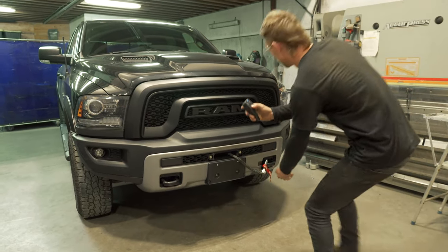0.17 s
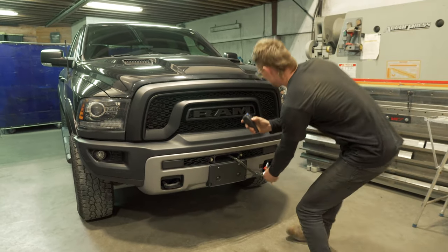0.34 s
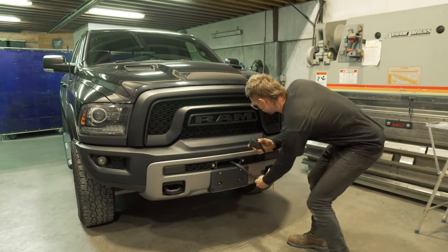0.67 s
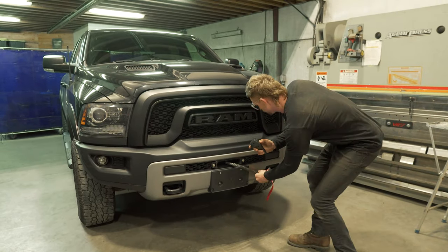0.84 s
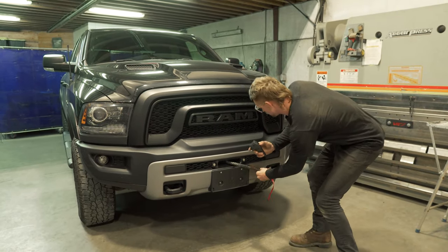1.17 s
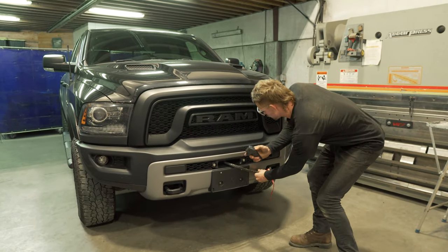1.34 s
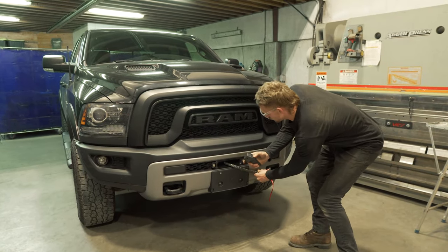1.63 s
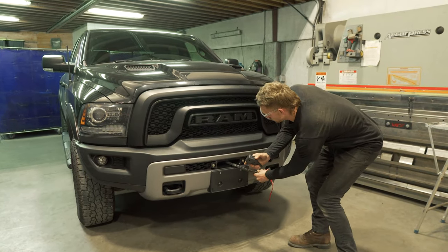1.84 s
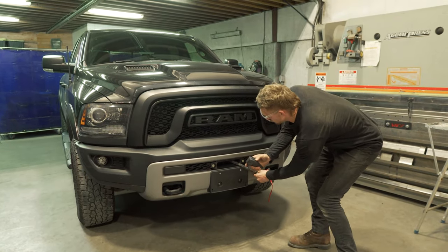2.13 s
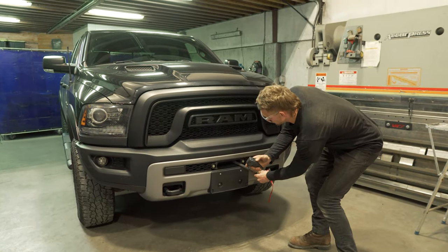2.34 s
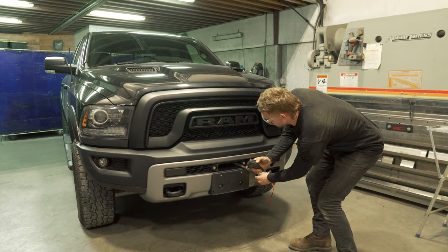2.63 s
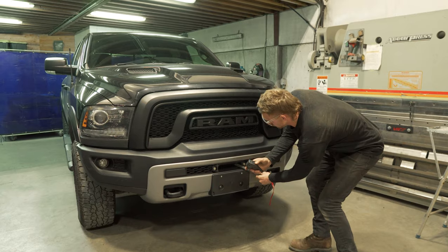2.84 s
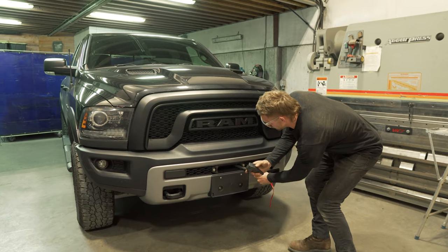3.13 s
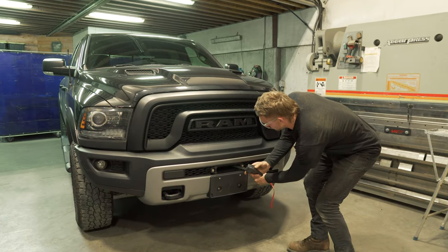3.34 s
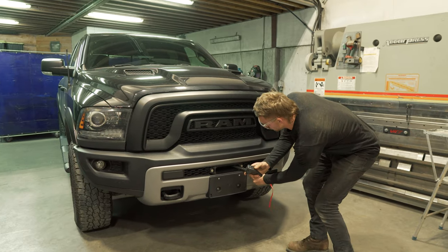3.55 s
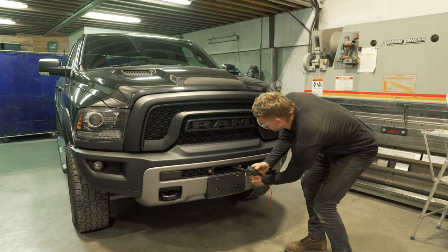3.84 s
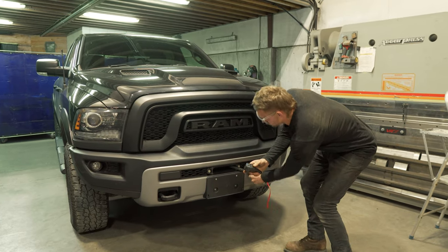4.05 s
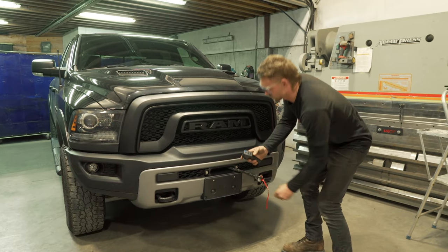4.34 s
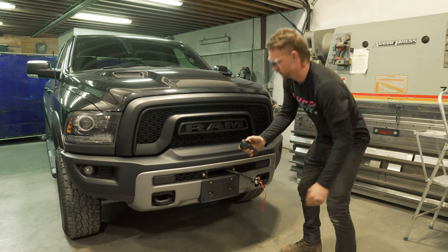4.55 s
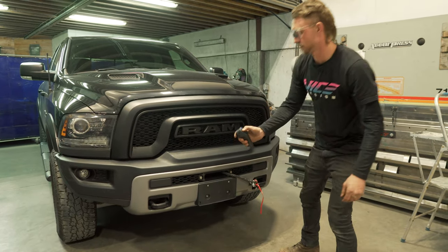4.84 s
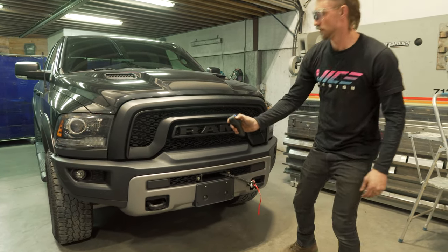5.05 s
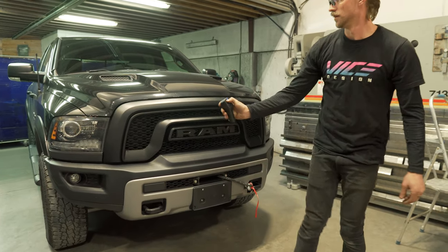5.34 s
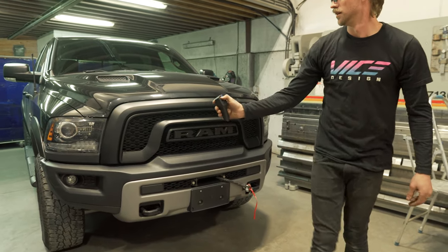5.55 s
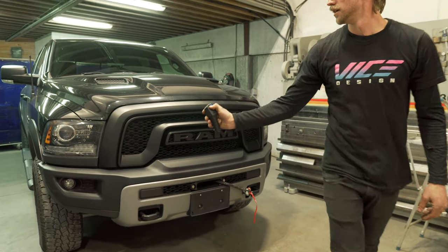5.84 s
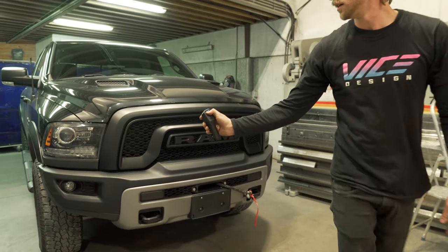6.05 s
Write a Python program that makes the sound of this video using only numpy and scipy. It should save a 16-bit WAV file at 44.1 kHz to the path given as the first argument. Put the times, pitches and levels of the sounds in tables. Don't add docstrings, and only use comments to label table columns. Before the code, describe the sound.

In a quietly humming workshop, boots scuff and land on concrete, then an electric winch grinds in two short bursts, followed by a step and a metallic hook snap.

```python
import sys
import numpy as np
from scipy import signal
from scipy.fft import rfft, irfft, next_fast_len
from scipy.io import wavfile
from scipy.ndimage import uniform_filter1d, map_coordinates

SR = 44100
rng = np.random.default_rng(int(sys.argv[2]) if len(sys.argv) > 2 else 0)


def ratio_of_db(decibels):
    return 10 ** (np.asarray(decibels, float) / 20)


def materialize(psi):
    bounded = np.clip(np.atleast_2d(psi).T, -1, 1)
    quanta = np.round(bounded * 32767).astype(np.int16)
    wavfile.write(sys.argv[1], SR, quanta)


N = 273222
SILENT_DB = -110
HIT_T = np.arange(SR // 4) / SR


def unit(x):
    return x / np.sqrt(np.mean(x ** 2) + 1e-20)


def along(points, hz):
    f, v = np.transpose(points)
    return np.interp(np.log(hz + 1), np.log(f + 1), v)


def curves(tables, outside=None):
    if outside is not None:
        def rest(s, row):
            return [(s,) + (outside,) * (len(row) - 1)]
        tables = [rest(t[0][0] - .004, t[0]) + list(t) + rest(t[-1][0] + .1, t[0]) for t in tables]
    s, *cols = np.transpose(sorted(tuple(row) for t in tables for row in t))
    return [np.interp(np.arange(N) / SR, s, c) for c in cols]


def wobble(rate):
    knots = rng.standard_normal(int(N * rate / SR) + 4)
    return map_coordinates(knots, [np.arange(N) * rate / SR])


def filtered(x, response):
    m = next_fast_len(N + SR // 2)
    return irfft(rfft(x, m) * response(np.fft.rfftfreq(m, 1 / SR)), m)[:N]


def patchy(x, patchy_db, count=5):
    z = signal.stft(np.pad(x, (0, 512)), nperseg=512)[2]
    field = uniform_filter1d(rng.standard_normal(z.shape), size=count, axis=0)
    field = uniform_filter1d(field, size=8, axis=1)
    return signal.istft(z * ratio_of_db(patchy_db * unit(field)), nperseg=512)[1][:N]


def rush(spectrum, patchy_db):
    noise = patchy(rng.standard_normal(N), patchy_db)
    return unit(filtered(noise, lambda hz: ratio_of_db(along(spectrum, hz))))


def swell(s, db, rise_s, fall_s):
    t = np.arange(N) / SR - s
    return ratio_of_db(db + 20 * np.minimum(t / rise_s, -t / fall_s))


def ring(hz, t60, rough, t, rise=0.00024, tone=1):
    around = signal.butter(2, [hz / 1.7, min(hz * 1.7, .45 * SR)], "bandpass", fs=SR)
    blur = unit(signal.lfilter(*around, rng.standard_normal(len(t))))
    vibration = tone * np.sin(2 * np.pi * hz * t) + rough * blur
    return vibration * ratio_of_db(-60 * t / t60) * (1 - np.exp(-t / rise))


def crack(t60):
    noise = np.diff(rng.standard_normal(len(HIT_T) + 2), 2)
    return unit(noise) * ratio_of_db(-60 * HIT_T / t60)


def add(track, s, x):
    part = track[round(s * SR):][:len(x)]
    part += x[:len(part)]


# pitch_hz, level_db (per Hz)
FAN_SPECTRUM = [(110, -21), (180, -10), (240, -7.5), (290, -10.5), (400, -9), (520, -11), (620, -13.5),
                (1260, -12), (1500, -18), (2500, -27.5), (4260, -34), (5600, -37.5), (6930, -45),
                (15800, -54)]


def fans():
    return ratio_of_db(-42.5 + 0.34 * wobble(4.075)) * rush(FAN_SPECTRUM, patchy_db=1.0)


# pitch_hz, level_db (per Hz)
RUMBLE_SPECTRUM = [(20, -6), (26, -1.5), (32, -7), (55, 1), (85, -15), (120, -5.5), (190, -13.5),
                   (260, -56)]


def rumble():
    noise = rng.standard_normal(N)
    return ratio_of_db(-45) * unit(filtered(noise, lambda hz: ratio_of_db(along(RUMBLE_SPECTRUM, hz)) * (hz > 18)))


# pitch_hz, level_db (rms)
HUM_TONES = [(118.4, -52), (237.5, -48), (360.7, -55), (522.2, -53.5)]


def hum():
    t = np.arange(N) / SR
    return sum(ratio_of_db(db + 2.5 + 0.72 * wobble(5)) * np.sin(2 * np.pi * hz * t + 0.13 * wobble(3.94))
               for hz, db in HUM_TONES)


# time_s, pitch_hz, level_db
AIR_SWINGS = [(0.0, 16.8, -23), (1.05, 16.8, -25), (1.31, 12.7, -21), (1.38, 12.8, -32), (1.72, 12.8, -21),
              (1.83, 12.8, -35), (2.09, 12.8, -18), (2.33, 12.8, -32), (2.59, 12.8, -23), (2.69, 12.8, -38),
              (3.14, 12.8, -25), (3.23, 12.7, -31), (3.35, 11.4, -18), (4.43, 11.4, -31), (4.69, 11.4, -19),
              (4.76, 11.4, -28), (5.63, 11.4, -19), (6.2, 11.4, -24)]


def air():
    hz, db = curves([AIR_SWINGS])
    phase = 2 * np.pi * np.cumsum(hz * (1 + .12 * wobble(5))) / SR
    swing = ratio_of_db(db + 2.2 + 2.8 * wobble(9)) * np.sin(phase)
    return filtered(swing, lambda f: 1 / (1 + (f / 21) ** 16))


# peak_s, sole_db, cloth_db, rise_s, fall_s (per 20 dB)
SCUFF_MOVES = [(.008, -44, -60, .03, .22), (.108, -42, -50, .02, .14), (.428, -44.5, -53, .015, .13),
               (.586, -41.5, -58, .17, .18), (.81, -24.5, -38.5, .09, .2), (1.224, -40.5, -55, .13, .1),
               (4.165, -50, -84, .05, .05), (4.259, -32, -39, .04, .033), (4.29, -47, -66, .04, .26),
               (4.583, -41, -59, .005, .3), (4.628, -37, -56, .055, .035), (4.69, -43, -56, .08, .17),
               (4.985, -57, -78, .04, .4), (5.398, -48, -74, .03, .025), (5.59, -50.5, -62, .15, .9),
               (5.81, -49.5, -63, .1, .45), (6.082, -54, -72, .4, .2), (6.195, -51, -62, .22, .2)]
# pitch_hz, level_db (per Hz)
SOLE_SPECTRUM = [(760, -11), (1300, -5.5), (1710, -10), (2460, -2.5), (2970, -1.5), (4710, -6.5),
                 (9000, -24), (11700, -51), (19800, -120)]
# pitch_hz, level_db (per Hz)
CLOTH_SPECTRUM = [(5000, -38.5), (8000, 2.5), (12000, -0.5), (15800, -4.5)]
# peak_s, level_db, rise_s, fall_s (per 20 dB)
BOOT_LANDINGS = [
    (.748, -46, .08, .12),
    (.89, -20.5, .014, .16),
    (.945, -26, .06, .06),
    (4.146, -31, .018, .09),
    (4.225, -40, .1, .1),
    (4.262, -25, .03, .09),
    (4.6, -43, .04, .5),
]
# pitch_hz, level_db (per Hz)
BOOT_SPECTRUM = [(59, -51), (100, -11), (279, -12.5), (373, -5.5), (423, -14), (781, -11), (2000, -30),
                 (2600, -78), (4400, -120)]


def scuffs():
    quicker = 1.25
    soles = [swell(s, db, up, down) for s, db, _, up, down in SCUFF_MOVES]
    cloths = [swell(s, db, up / quicker, down / quicker) for s, _, db, up, down in SCUFF_MOVES]
    sole = np.max(soles, axis=0).clip(ratio_of_db(-63))
    cloth = np.max(cloths, axis=0).clip(ratio_of_db(-79))
    boot = sum(swell(*row) for row in BOOT_LANDINGS)
    grit = unit(ratio_of_db(1.15 * wobble(250)))
    drag = sole * rush(SOLE_SPECTRUM, patchy_db=1.0) + cloth * rush(CLOTH_SPECTRUM, patchy_db=-1.5)
    return grit * drag + ratio_of_db(-2.0) * boot * rush(BOOT_SPECTRUM, patchy_db=-0.5)


# start_s, level_db (peak)
DRY_TICKS = [(0.4289, -46), (1.5179, -47), (1.686, -49), (2.92, -50), (4.257, -28), (5.1362, -46),
             (5.3752, -47), (5.7544, -56)]


def dry_ticks(out):
    for s, db in DRY_TICKS:
        add(out, s, ratio_of_db(db - 2) * crack(.012))


# start_s, level_db (peak), pitch_hz, t60_s
BOOT_THUDS = [
    (.887, -10, 410, 0.063),
    (0.946, -24, 357, .09),
    (1.357, -25, 230, .04),
    (4.256, -14.5, 198, 0.054),
]


def boot_thuds(out):
    for s, db, hz, t60 in BOOT_THUDS:
        add(out, s, ratio_of_db(db + 0.5) * ring(hz, t60, 0.2, HIT_T, rise=0.0023))


# start_s, pitch_hz, level_db, t60_s
STEEL_TONES = [(.12, 6780, -70, 1.2), (.9, 10100, -45, .25), (.92, 13500, -58, .2), (3.82, 6800, -64, 2),
               (5.392, 5000, -47, 0.057), (5.392, 3650, -52, .06)]


def steel_tones(out):
    for s, hz, db, t60 in STEEL_TONES:
        add(out, s, ratio_of_db(db) * ring(hz, t60, .05, np.arange(SR) / SR, rise=0.0021))


# start_s, level_db (peak)
KEY_TAPS = [(5.4869, -51), (5.5064, -48), (5.5273, -45), (5.5744, -51), (5.5827, -46), (5.6012, -48),
            (5.6124, -52), (5.6755, -47)]


def keys(out):
    for s, db in KEY_TAPS:
        low, high = ring(7900, .018, .6, HIT_T, tone=.7), ring(12100, .015, .6, HIT_T)
        add(out, s, ratio_of_db(db - 2.5) * (low + .3 * high))


# pitch_hz, level_db, t60_s
HOOK_MODES = [(1100, -5, .045), (2000, -4, .04), (2400, -5, .04), (2750, -4, .04), (3350, -3, .036),
              (3900, -6, .03), (4800, -9, .025)]


def hook_snap(out):
    start_s, level_db = 4.6522, -14.5
    dull = signal.butter(4, 5800, fs=SR)
    for hz, db, t60 in HOOK_MODES:
        mode = ring(hz, t60, 0.45, HIT_T, tone=.4)
        add(out, start_s, ratio_of_db(level_db + db) * signal.lfilter(*dull, mode))


# start_s, level_db (peak), pitch_hz, t60_s, treble_db
SMALL_CLICKS = [(0.2947, -37.5, 2930, 0.037, -16), (1.7884, -11, 3170, 0.04, -16),
                (2.7477, -56, 2150, 0.042, -16), (2.8953, -26, 3160, 0.051, -16),
                (2.9407, -12, 2410, 0.042, -16), (4.1425, -34, 2510, 0.067, -20),
                (4.5805, -30.5, 2400, 0.034, -16), (5.3173, -38, 2820, 0.021, -16),
                (5.8114, -34, 2370, 0.04, -16), (6.0751, -41, 2178, 0.04, -16)]


def clicks(out):
    for s, db, hz, t60, treble_db in SMALL_CLICKS:
        body = ring(hz, t60, 1.43, HIT_T, tone=0.25)
        add(out, s, ratio_of_db(db - 12) * (body + ratio_of_db(treble_db) * crack(0.56 * t60)))


# start_s, level_db (peak), pitch_hz, t60_s
BRAKE_BITES = [
    (2.567, -36, 5500, 0.078),
    (2.567, -36, 5140, 0.044),
    (3.668, -33, 5400, .1),
    (3.668, -36, 5900, .05),
]


def brake(out):
    for s, db, hz, t60 in BRAKE_BITES:
        add(out, s, ratio_of_db(db) * ring(hz, t60, .35, HIT_T, rise=.003))


# start_s, level_db (peak), pitch_hz, t60_s
GEAR_KNOCKS = [(1.723, -3, 854, 0.058), (1.743, -9, 996, 0.06), (1.834, -4.5, 451, 0.066),
               (1.849, -5, 488, 0.054), (1.865, -6.5, 1172, 0.073), (2.954, -5.5, 869, 0.16),
               (2.974, -9, 1176, 0.055), (2.994, 2, 530, 0.025), (3.07, -15.5, 460, 0.05),
               (3.084, -14, 490, 0.051), (3.319, -13, 601, 0.072), (3.609, -10.5, 936, 0.061),
               (1.734, -14, 1705, 0.044),
    (1.784, -6, 1636, 0.075),
    (1.794, -7, 1730, 0.053),
    (2.965, -9, 1690, 0.06),
    (3.031, -8, 1610, 0.06),
]


def gear_knocks(out):
    for s, db, hz, t60 in GEAR_KNOCKS:
        add(out, s, ratio_of_db(db - 4.5) * ring(hz, t60, 0.47, HIT_T, rise=0.0012))


def hits():
    out = np.zeros(N)
    for source in (dry_ticks, boot_thuds, steel_tones, keys, hook_snap, clicks, brake, gear_knocks):
        source(out)
    return out


# start_s, level_db (strength)
RELAY_CLOSES = [
    (1.698, 0),
    (2.9328, -2),
]


def driven(motion, law, delay_s, jolt_db, rise_s, fall_s):
    speed_db, strain_db = motion
    full_db, by_speed, by_strain = law
    jolt = sum(swell(s + delay_s, jolt_db + relay_db, rise_s, fall_s) ** 2 for s, relay_db in RELAY_CLOSES)
    running = ratio_of_db(full_db + by_speed * (speed_db + 30) + by_strain * strain_db)
    return np.sqrt(running ** 2 + jolt)


# pitch_hz, level_db (per Hz)
GRIND_SPECTRUM = [(53, -46), (90, -4.5), (180, -7.5), (359, -3.5), (553, 0.5), (687, -9.5), (1210, -5.5),
                  (1500, -13), (2110, -14), (2620, -10), (5130, -21.5), (6230, -29), (8620, -32),
                  (12700, -25), (15800, -30.5)]


def part_of_winch(blows, modes, lo_hz, hi_hz, modes_db, spiky_db, shifting_db):
    contacts = rng.standard_normal(N) * ratio_of_db(spiky_db * wobble(420)) + blows

    def body(f):
        band = 1 / np.sqrt((1 + (lo_hz / (f + 1)) ** 8) * (1 + (f / hi_hz) ** 8))
        peaks = sum(ratio_of_db(db) * 1j * f * w / (c * c - f * f + 1j * f * w) for c, w, db in modes)
        grind = ratio_of_db(along(GRIND_SPECTRUM, f)) / ratio_of_db(along(GRIND_SPECTRUM, modes[0][0]))
        return band * (grind + ratio_of_db(modes_db) * peaks)

    return unit(patchy(filtered(contacts, body), shifting_db, count=6))


# pitch_hz, width_hz, level_db
DRUM_MODES = [(335, 98, 1), (410, 86, -1), (535, 59, -4)]
# level_db, db_per_speed_db, db_per_strain_db
DRUM_DRIVE = (-24, .56, .55)


def drum(blows, motion):
    sound = part_of_winch(.5 * blows, DRUM_MODES, 60, 544, modes_db=4, spiky_db=-1.0, shifting_db=0.0)
    return sound * driven(motion, DRUM_DRIVE, delay_s=.005, jolt_db=-20, rise_s=.006, fall_s=.14)


# pitch_hz, width_hz, level_db
CASING_MODES = [(784, 25, 5), (863, 25, 6.5), (976, 14, -2), (1058, 30, 0), (1184, 17, 2.5),
                (1306, 15, -6.5), (1560, 11, -21), (1666, 25, 5), (1950, 43, -7)]
# level_db, db_per_speed_db, db_per_strain_db
CASING_DRIVE = (-19.5, .74, .15)


def casing(blows, motion):
    sound = part_of_winch(.49 * blows, CASING_MODES, 696, 2150, modes_db=-4.0, spiky_db=-0.4, shifting_db=1.0)
    return sound * driven(motion, CASING_DRIVE, delay_s=.03, jolt_db=-13, rise_s=.026, fall_s=.09)


# pitch_hz, width_hz, level_db
TEETH_MODES = [(2560, 84, 2), (2820, 27, -26), (3150, 130, -6.5), (3430, 51, 2), (3775, 190, -3),
               (4260, 100, -6), (4670, 100, -2.5), (5010, 100, -4), (5420, 70, -5)]
# level_db, db_per_speed_db, db_per_strain_db
TEETH_DRIVE = (-20, 1.15, 1.01)


def teeth(blows, motion):
    sound = part_of_winch(.35 * blows, TEETH_MODES, 1950, 7000, modes_db=-4.5, spiky_db=1.8, shifting_db=1.1)
    return sound * driven(motion, TEETH_DRIVE, delay_s=.007, jolt_db=-14, rise_s=.005, fall_s=.05)


# pitch_hz, width_hz, level_db
BRUSH_MODES = [(9600, 68, 2), (10100, 60, -4), (10700, 60, -8), (10600, 60, -9), (12040, 60, -3),
               (12500, 55, 3), (13000, 55, -3)]


def brushes(blows, motion):
    sound = part_of_winch(.15 * blows, BRUSH_MODES, 7000, 17000, modes_db=1.5, spiky_db=1.2, shifting_db=.7)
    return ratio_of_db(motion[0] + .3) * sound


# time_s, pitch_hz, level_db
MESH_BURSTS = [
    [(1.85, 407.7, -39), (1.894, 376.3, -32), (1.92, 372.8, -38), (1.976, 393.4, -22), (2.022, 362.5, -40),
     (2.062, 393, -42), (2.156, 336, -37), (2.206, 355.2, -31), (2.45, 324.4, -37)],
    [(3.3, 446.3, -30), (3.354, 423.8, -30), (3.398, 376.6, -22.5), (3.458, 354, -20.5), (3.58, 327.8, -36),
     (3.636, 344.8, -31), (3.72, 341.7, -46)],
]


def gear_mesh():
    hz = curves(MESH_BURSTS)[0]
    db = curves(MESH_BURSTS, outside=SILENT_DB)[1]
    turn = 2 * np.pi * np.cumsum(hz * (1 + 0.01356 * wobble(30))) / SR
    return ratio_of_db(db + 2.5 + 2.2 * wobble(24.82)) * np.sin(turn)


# time_s, speed_db (as brush hiss), strain_db (of the rope)
WINCH_BURSTS = [
    [(1.699, -44, 0), (1.71, -35.5, -1), (1.85, -30, 2.5), (2.084, -34.5, 1), (2.17, -35, 4.5),
     (2.3, -38, -1.5), (2.5, -45, 1.5), (2.62, -53, 1), (2.745, -82, 0)],
    [(2.935, -48, 0), (2.99, -36.5, 0), (3.076, -31.5, 3.5), (3.11, -31, -2.5), (3.4, -36, -2),
     (3.46, -38, 6), (3.61, -41.5, -.8), (3.774, -54.5, 1.5), (3.85, -84, 0)],
]


def winch():
    motion = curves(WINCH_BURSTS, outside=SILENT_DB)
    blows = unit((rng.random(N) < 500 / SR) * rng.standard_normal(N))
    return sum(part(blows, motion) for part in (drum, casing, teeth, brushes)) + gear_mesh()


# pitch_hz, t60_s
WALL_DECAY = [(200, 0.49), (2000, 0.44), (10000, 0.19)]


def walls(x):
    hz, t, z = signal.stft(rng.standard_normal(SR // 2), SR, nperseg=256)
    tail = signal.istft(z * ratio_of_db(-60 * t / along(WALL_DECAY, hz)[:, None]), SR, nperseg=256)[1]
    return signal.fftconvolve(np.pad(x, (300, 0)), tail / np.linalg.norm(tail))[:N]


def scene():
    shop = fans() + rumble() + hum() + air()
    sharp, motor = hits(), winch()
    echo = ratio_of_db(-8) * walls(sharp) + ratio_of_db(-13) * walls(motor)
    return (shop + scuffs() + sharp + motor + echo)[None]


def band_limit(x):
    return signal.sosfilt(signal.butter(12, 15940, fs=SR, output="sos"), x)


def record(dry):
    soft = dry / (1 + np.abs(dry / .95) ** 4) ** (1 / 4)
    mix = filtered(soft[0], lambda hz: hz < 15850)[None]
    return band_limit(mix)


dry = scene()
out = record(dry)
materialize(out)
```